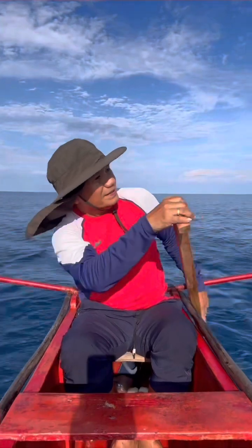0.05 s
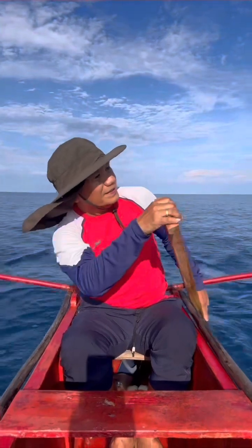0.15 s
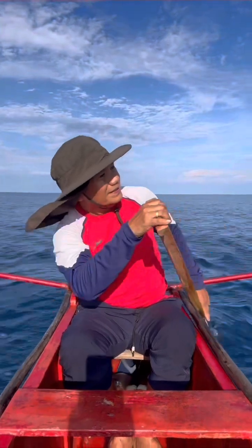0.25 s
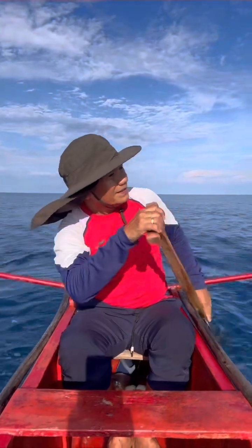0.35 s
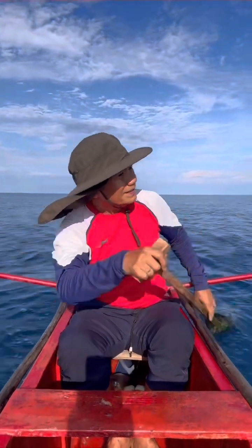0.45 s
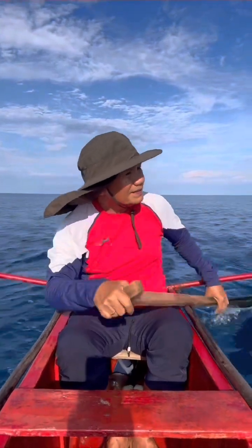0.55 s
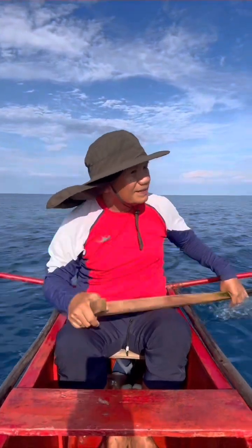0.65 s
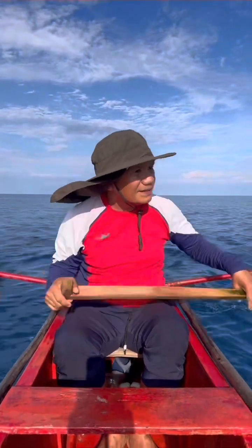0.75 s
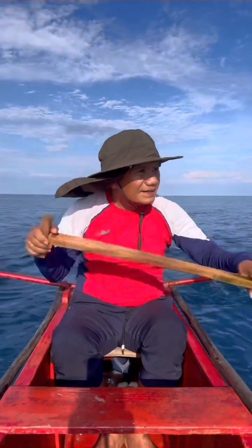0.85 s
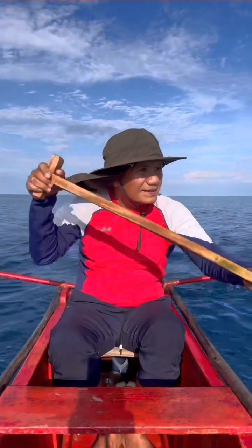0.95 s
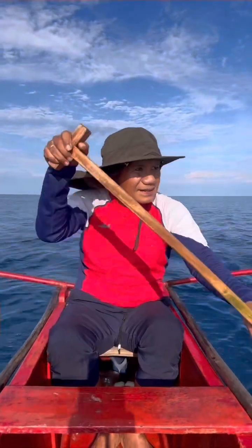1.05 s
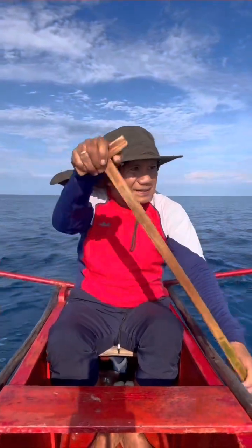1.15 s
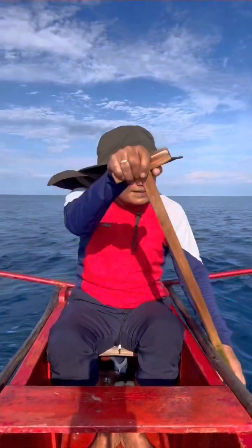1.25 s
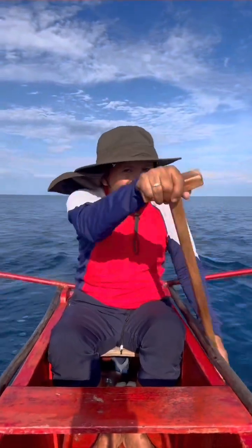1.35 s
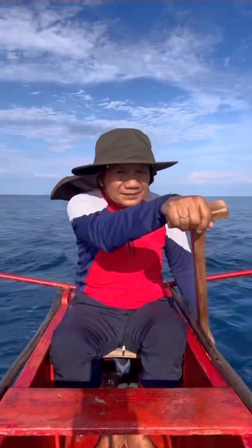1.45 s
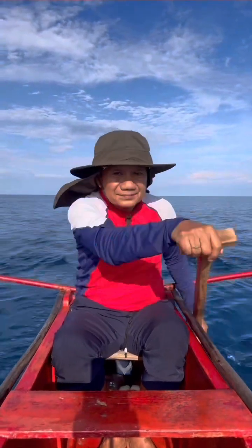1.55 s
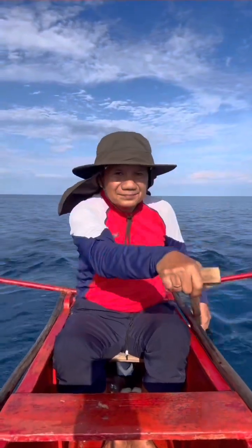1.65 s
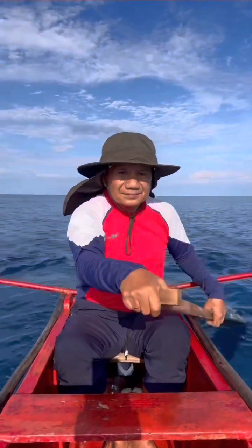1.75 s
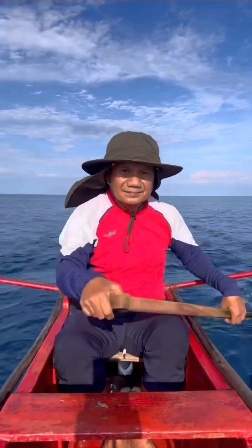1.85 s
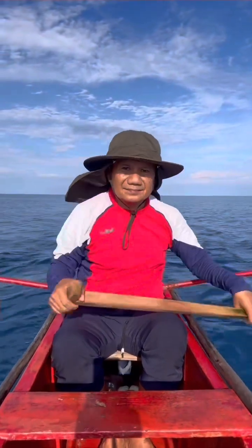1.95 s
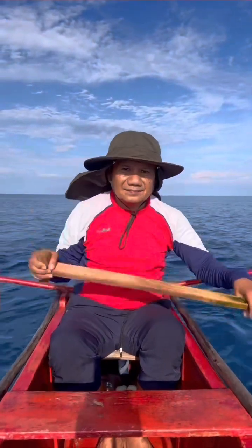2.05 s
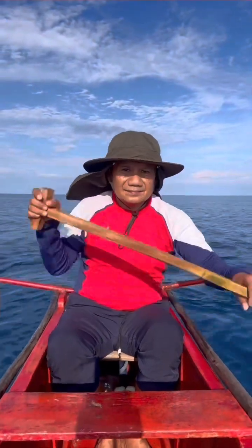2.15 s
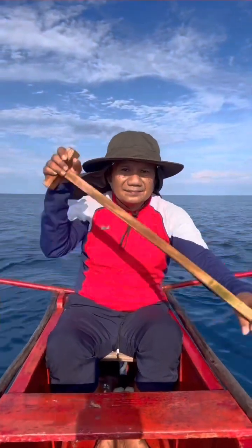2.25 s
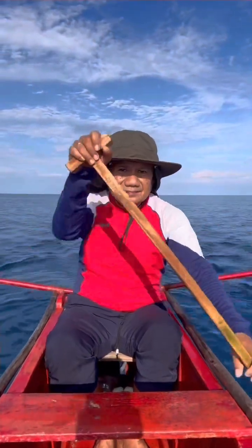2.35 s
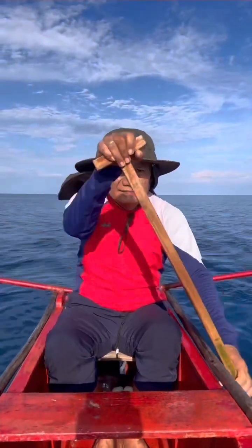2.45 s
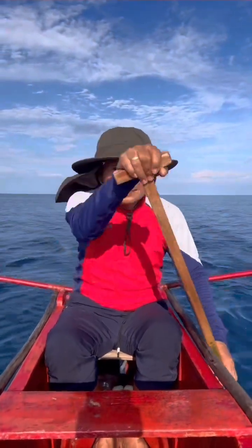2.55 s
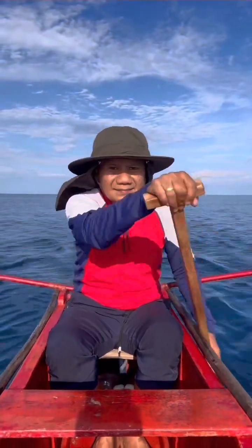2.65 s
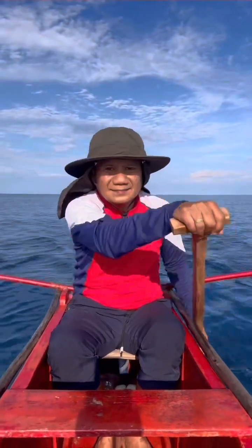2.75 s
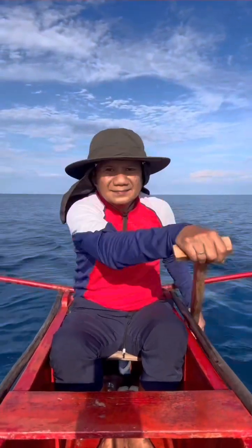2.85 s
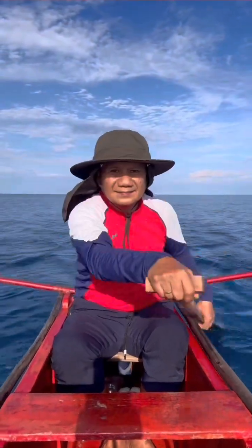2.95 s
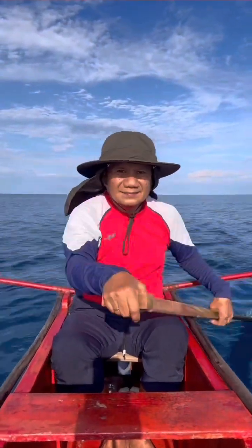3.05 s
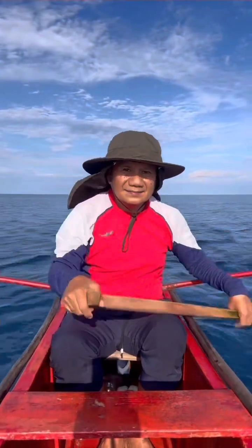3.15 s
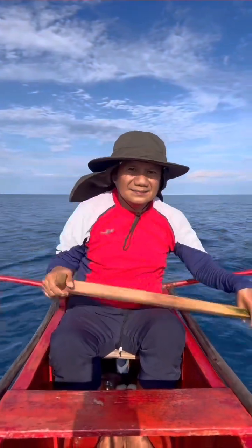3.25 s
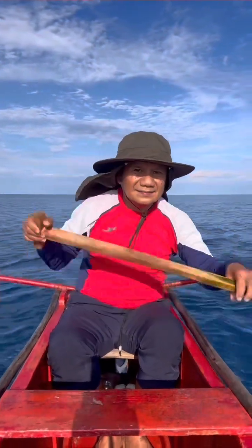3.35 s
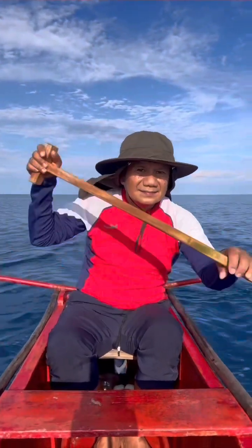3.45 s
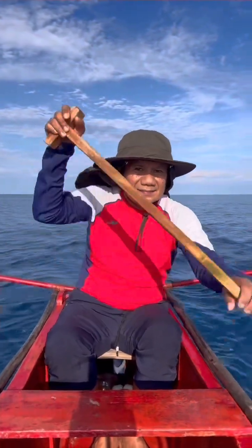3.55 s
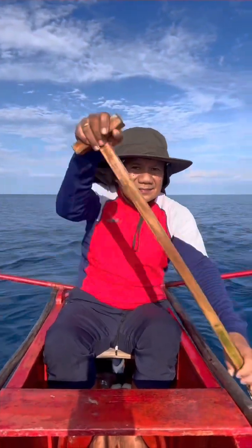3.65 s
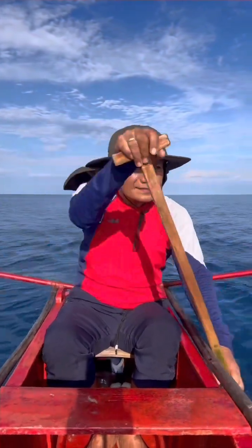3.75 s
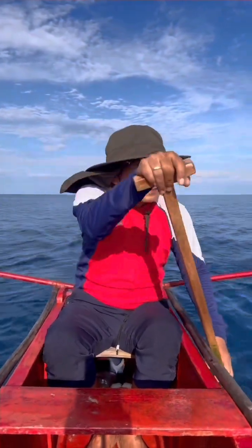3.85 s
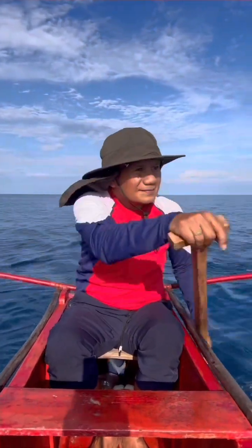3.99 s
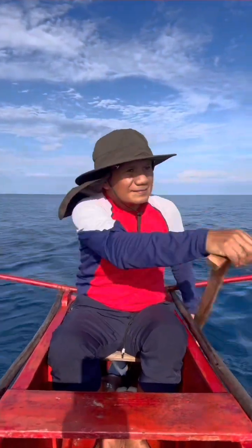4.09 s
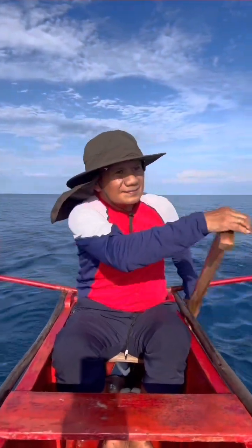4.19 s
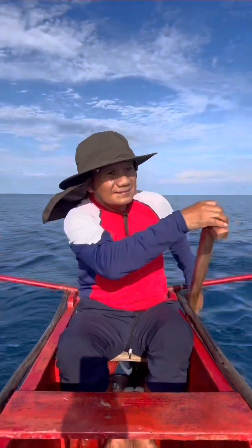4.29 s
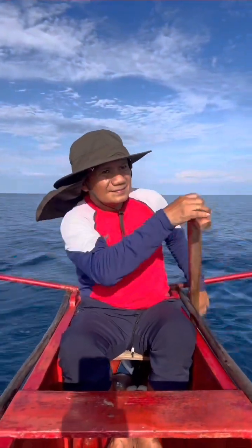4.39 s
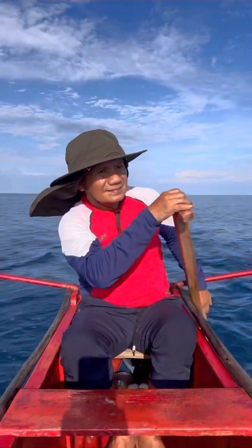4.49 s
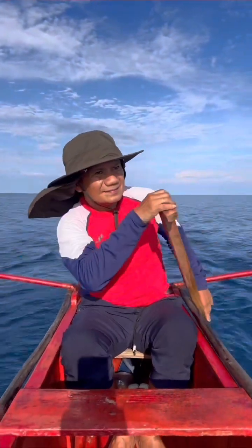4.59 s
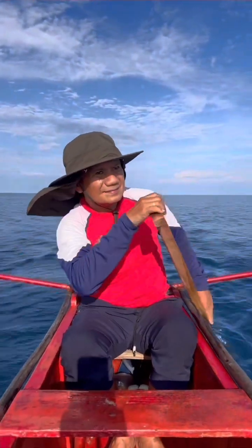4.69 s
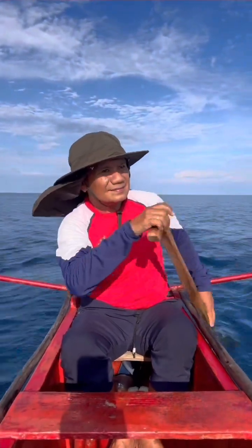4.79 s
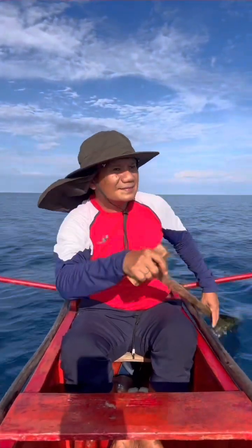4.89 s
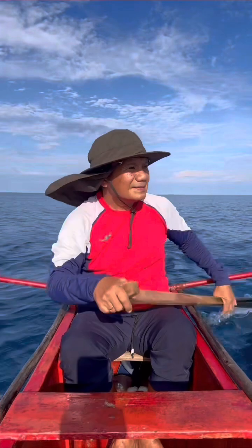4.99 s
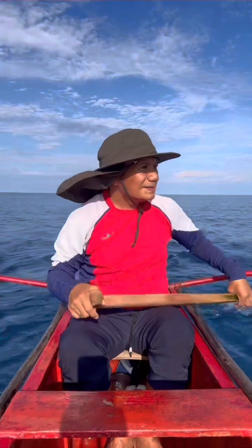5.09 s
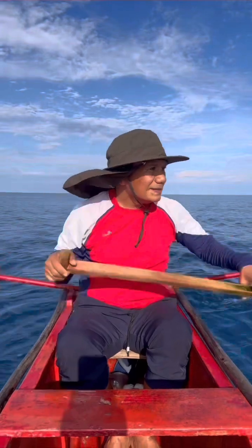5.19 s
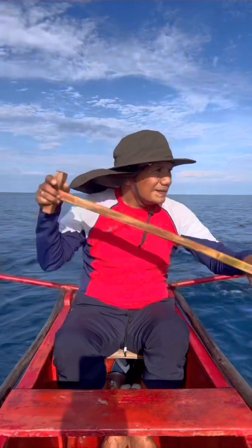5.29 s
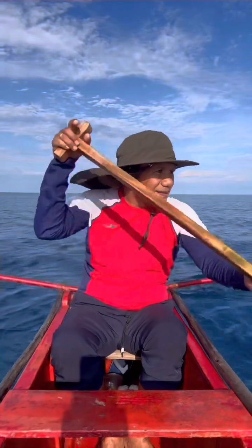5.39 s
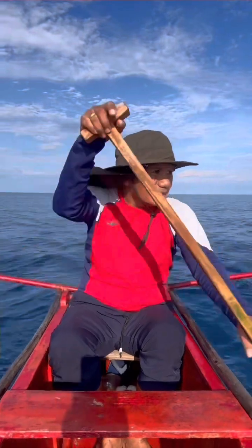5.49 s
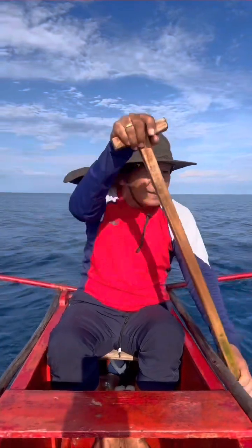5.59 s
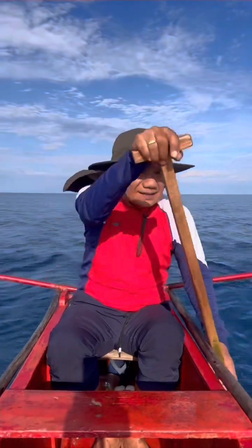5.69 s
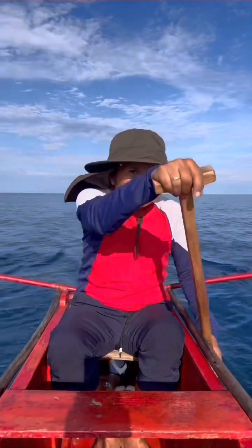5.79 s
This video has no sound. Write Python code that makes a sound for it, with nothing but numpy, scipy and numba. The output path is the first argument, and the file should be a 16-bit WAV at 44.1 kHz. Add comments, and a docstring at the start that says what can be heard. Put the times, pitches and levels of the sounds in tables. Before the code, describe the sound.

A wooden paddle strokes calm open water beside a small boat, with splashing entries, hollow gulps, bubbling plops, drips and light wind rumble.

```python
"""Paddling a small outrigger

A wooden paddle drives a small outrigger over a calm open sea, a stroke every second or two.
The blade splashes in and drags down air that gulps against the hull; bubbles and drips are heard too.
Gulps, plops and trickles are gliding sine bubbles; slaps, ticks and swashes add bursts of noise.
Ripples lap all round as crowds of bubbles, and shaped noise makes the hull's rumble and the light wind."""
import sys
import numpy as np
from scipy import signal
from scipy.fft import rfft, irfft, next_fast_len
from scipy.io import wavfile
from scipy.ndimage import uniform_filter1d
from numba import njit

SR = 44100
rng = np.random.default_rng(int(sys.argv[2]) if len(sys.argv) > 2 else 0)


def put_to_file(sound):
    """Save the sound as 16-bit audio at rate SR, in the file named by the first command-line argument."""
    columns = np.atleast_2d(sound).T  # one column per channel
    safe = np.clip(columns, -1, 1)
    whole_steps = np.round(safe * 32767)
    wavfile.write(sys.argv[1], SR, whole_steps.astype(np.int16))


N = 257103
TIME = np.arange(N) / SR

# Levels in these tables come before the hull's ringing and any trim made inside the functions.
# Falling times (called t60) are the seconds a sound takes to drop by 60 dB.

# Air pockets closing under water. Each row: start in seconds, level in dB, pitch in Hz, swell in seconds,
# falling time in seconds, hull boom in dB against the gulp, burble in dB against the gulp.
GULPS = [(0.495, -33, 240, 0.041, 0.032, -2, 9.5), (1.204, -16, 190.5, 0.016, 0.072, -7.5, 5.5),
         (1.245, -34.5, 199, 0.024, .16, 4, -3), (1.364, -35, 255, 0.025, 0.059, -7, 1.5),
         (2.535, -30, 213, 0.016, 0.15, 0.5, 4.5), (2.927, -45.5, 324, 0.014, 0.096, -11, 17),
         (3.653, -29.5, 192, 0.0071, 0.14, -9, 1), (3.698, -25, 202.7, 0.01, 0.19, -4, -5),
         (3.724, -24, 174.6, 0.015, 0.17, 1.5, 9), (3.750, -23.5, 211, .008, 0.15, 5.5, -5),
         (3.948, -33.5, 272.4, 0.021, 0.21, 4, 17.5), (4.194, -20, 200.8, 0.012, 0.21, -8.5, 7.5),
         (4.228, -26.5, 246, 0.01, 0.08, -8, -4), (4.936, -27.5, 362, 0.0056, 0.074, -38, 1),
         (5.562, -32.5, 201, 0.013, 0.17, -50, -27), (5.647, -26.5, 201.5, 0.019, 0.11, -2, 3)]
# A larger, deeper lobe follows each gulp; its pitch is a share of the gulp's.
DEEP_LOBE_DELAY_S, DEEP_LOBE_DB, DEEP_LOBE_PITCH, DEEP_LOBE_T60_S = 0.01225, -8, 0.744, 0.09
# Plops, each a knot of bubbles. Each row: start in seconds, level in dB, pitch in Hz,
# falling time in seconds, glide as a share of the pitch.
PLOPS = [(0.319, -31, 2680, 0.018, -0.076), (0.362, -22, 850, 0.028, 0.2), (0.547, -30, 1180, .04, .1),
         (0.65, -22.5, 810, 0.058, 0.32), (0.681, -30, 850, .04, .1), (0.825, -25, 874, 0.12, 0.21),
         (0.901, -24, 1440, 0.036, 0.22), (1.066, -30, 2380, .02, 0.069), (1.073, -22, 1620, 0.023, -0.022),
         (1.09, -22, 1680, .022, 0.067), (1.102, -20, 1390, .02, .15), (1.122, -18, 884, 0.09, 0.072),
         (1.142, -16, 1320, 0.026, .1), (1.145, -20, 780, .025, .1), (1.180, -20, 1220, .03, 0.1),
         (1.191, -17, 1180, .02, 0.065), (1.193, -21, 1850, 0.023, .1), (1.211, -22, 690, 0.023, -0.14),
         (1.224, -18, 547, 0.063, -.1), (1.382, -31, 2560, .02, .1), (1.476, -30.5, 2820, .025, 0.32),
         (1.555, -22, 2100, .022, .05), (1.557, -20.5, 2730, 0.043, 0.14), (1.610, -24, 1054, 0.049, .1),
         (1.791, -21.5, 1740, 0.032, .2), (1.875, -24.5, 1950, 0.05, 0.058), (1.911, -27, 1440, .035, 0.14),
         (2.052, -26.5, 950, .045, .1), (2.087, -21.5, 1046, 0.066, 0.46), (2.167, -28, 1880, 0.036, 0.093),
         (2.295, -25, 2050, 0.04, -0.11), (2.322, -17.5, 1720, 0.029, 0.3), (2.422, -29, 1400, .03, .1),
         (2.453, -26.5, 760, 0.037, 0.046), (2.487, -28, 978, 0.12, 0.13),
         (2.541, -25.5, 1870, 0.073, 0.16), (2.737, -23, 2120, 0.036, 0.038), (2.945, -25, 443, 0.17, 0.32),
         (3.013, -29.5, 1870, .035, 0.058), (3.056, -26, 1195, 0.053, 0.065),
         (3.303, -26, 1025, .04, 0.059), (3.620, -20.5, 2000, 0.025, -.1), (3.623, -21, 1520, 0.041, -.4),
         (3.654, -13, 1560, .012, 0.055), (3.654, -19, 430, 0.028, .1), (3.633, -23, 1154, 0.066, -.1),
         (3.681, -24, 590, 0.035, .3), (3.696, -13, 1230, 0.019, 0.1), (3.728, -17, 740, 0.027, 0.12),
         (3.957, -20, 397, .035, -0.25), (4.031, -17.5, 480, 0.067, -0.064), (4.046, -15, 463, 0.13, 0.047),
         (4.122, -26, 685, 0.1, 0.36), (4.150, -23, 1106, 0.056, 0.2), (4.198, -17, 790, 0.035, -0.2),
         (4.222, -21, 525, 0.061, -0.31), (4.28, -23, 850, .035, 0.26), (4.297, -18.5, 790, 0.049, 0.067),
         (4.314, -22.5, 770, 0.047, -0.012), (4.314, -20, 1800, 0.033, .05),
         (4.408, -24, 1920, 0.034, -0.026), (4.41, -25, 866, 0.037, .1), (4.463, -20.5, 590, 0.031, -0.22),
         (4.481, -20.5, 417, .06, 0.16), (4.664, -25.5, 2800, 0.032, 0.33), (4.723, -20, 2340, 0.025, 0.11),
         (4.811, -23.5, 987, 0.046, 0.23), (4.843, -26, 927, 0.045, .2), (4.949, -20, 2210, 0.059, 0.05),
         (5.009, -17, 740, 0.058, 0.15), (5.043, -25, 770, 0.11, 0.17), (5.218, -19.5, 1115, 0.038, 0.15),
         (5.313, -24.5, 400, 0.05, 0.025), (5.318, -26.5, 1104, 0.041, 0.24),
         (5.419, -23.5, 1170, 0.06, 0.18), (5.429, -24.5, 1290, .03, .05), (5.564, -27, 1020, .04, .1),
         (5.672, -23.5, 2760, 0.014, 0.078), (5.734, -24.5, 2680, 0.011, 0.2)]
# The blade and thrown water smack the surface. Each row: start in seconds, peak in dB, pitch in Hz,
# falling time in seconds.
SLAPS = [(0.312, -33, 2740, 0.11), (0.826, -34, 1720, 0.03), (1.039, -30, 4350, .02),
         (1.057, -29, 3930, 0.016), (1.069, -31, 1810, 0.071), (1.1, -32, 4600, .018),
         (1.122, -25, 4540, 0.027), (1.146, -38, 4000, 0.019), (1.177, -34, 4300, .02),
         (1.185, -31, 4150, 0.017), (1.208, -35, 620, 0.098), (1.211, -28.5, 1480, 0.044),
         (1.331, -31, 1710, 0.033), (1.558, -45, 2500, 0.042), (2.293, -31, 2030, 0.028),
         (2.325, -24.5, 2070, 0.047), (2.352, -31, 3900, 0.11), (2.736, -34, 1820, 0.05),
         (3.588, -27.5, 2020, 0.053), (3.655, -24, 1700, 0.011), (3.678, -31, 1510, 0.02),
         (3.696, -27, 1370, 0.016), (3.728, -26, 670, .14), (3.951, -30, 520, 0.1),
         (4.03, -31.5, 520, 0.028), (4.198, -27, 740, 0.036), (4.279, -31, 2880, 0.045),
         (4.313, -29.5, 1880, 0.053), (4.462, -28.5, 957, 0.06), (5.47, -32, 1990, .03),
         (5.548, -27.5, 2440, .04), (5.614, -27.5, 987, 0.022)]
# Sheets of water fold over into foam. Each row: start in seconds, length in seconds, average (rms) level
# in dB, centre in Hz.
SWASHES = [(0.0, 0.18, -50, 895), (0.024, 0.2, -52.5, 3600), (0.45, 0.14, -46, 299), (0.52, 0.22, -45, 810),
           (1.036, 0.052, -53, 4150), (1.054, 0.17, -47.5, 1680), (1.113, 0.05, -43, 4800),
           (1.216, 0.03, -39, 546), (1.241, 0.066, -48, 325), (1.825, 0.067, -45.5, 2780),
           (2.317, 0.094, -45.5, 3250), (2.987, 0.31, -64, 3200), (3.60, 0.047, -58, 1860),
           (3.712, 0.076, -40.5, 1800), (3.723, 0.042, -33, 770), (3.761, 0.041, -43, 473),
           (3.808, 0.088, -48, 1090), (3.982, 0.17, -53.5, 3250), (4.237, 0.17, -42, 179.6),
           (4.439, 0.093, -52.5, 3000), (4.90, 0.13, -50, 670), (4.942, 0.04, -54, 2200),
           (5.196, 0.042, -43.5, 2400), (5.517, 0.07, -45.5, 3600), (5.63, 0.047, -43, 590)]
# Chains of bubbles running up or down in pitch. Each row: start in seconds, length in seconds,
# loudest bubble in dB, first pitch in Hz, last pitch in Hz.
TRICKLES = [(0.321, .03, -33.5, 2720, 2190), (0.518, .035, -36, 593, 1160), (0.64, .06, -36, 776, 1000),
            (0.843, .035, -38, 1710, 2420), (1.273, .07, -39, 1860, 1960), (2.855, .03, -38.5, 700, 1280),
            (2.955, .02, -38.5, 1900, 2800), (3.017, .02, -37.5, 3200, 3600),
            (3.327, .022, -35, 1190, 1930), (3.372, .04, -38.5, 2300, 1960),
            (3.744, .035, -34.5, 2500, 3000), (4.053, .035, -39, 734, 1120)]
# Drops hitting the boat. Each row: start in seconds, level in dB, pitch in Hz.
TICKS = [(0.309, -33, 4300), (0.659, -31, 5360), (0.779, -26.5, 11400), (1.007, -26, 8600),
         (1.307, -17.5, 12500), (1.418, -28, 10300), (2.143, -27, 3080), (2.263, -25, 8900),
         (2.325, -19.5, 5730), (2.414, -24, 8050), (2.474, -29, 12900), (2.5197, -17.5, 9800),
         (2.521, -22, 5030), (2.564, -24.5, 9300), (2.617, -30, 4960), (2.706, -29, 7240),
         (2.88, -25.5, 6400), (3.02, -20.5, 7600), (3.031, -32, 6100), (3.655, -27, 7130),
         (3.866, -13, 6170), (3.883, -30, 12500), (3.964, -32, 5530), (4.082, -22, 11200),
         (4.151, -27, 3140), (4.31, -37, 7670), (4.609, -26, 14800), (4.688, -29, 8500),
         (4.789, -28.5, 6200), (5.323, -23.5, 5650), (5.428, -25.5, 9400), (5.609, -19, 13100),
         (5.678, -21, 12100), (5.732, -16.5, 12500)]

# Swells nudge the hull, which booms softly. Each row: start in seconds, level in dB.
NUDGES = [(0.0, -32), (0.44, -32.5), (1.572, -33), (2.05, -31.5), (2.66, -41), (3.25, -30), (4.529, -37),
          (4.789, -39), (5.059, -31)]
# The hull's lowest notes. Each row: pitch in Hz, level in dB, falling time in seconds.
HULL_NOTES = [(96.85, -1, 0.27), (132.2, -9, 0.17)]
BOOM_DELAY_S, BOOM_SWELL_S = 0.0225, 0.033    # the hull answers a gulp late and slowly
# The wooden hull rings along with the water. Each row: pitch in Hz, width in Hz, level in dB.
HULL_MODES = [(140.4, 20, -6.5), (203, 37, -4), (259, 10.7, -1), (406, 6.8, -1.5), (492, 10.4, -3.5),
              (764, 7.3, -33)]

# Paddle strokes, each with a spell of dripping. Each row: blade entry in seconds, entry length in seconds,
# spray in dB, churn in dB, pull length in seconds, hull rumble in dB, time when the dripping is at its fullest
# in seconds, drips in dB.
STROKES = [(-0.5, 0.11, -48, -45, 0.85, -52, 0.35, -72), (1.056, 0.15, -46, -44, 0.4, -40.5, 4.9, -68),
           (2.286, 0.15, -48.5, -47.5, 0.5, -40.5, 3.1, -52.5),
           (3.614, 0.13, -46, -45, 1.43, -41, 4.8, -56), (5.437, 0.2, -48, -51, .4, -39, 4.3, -71)]
ENTRY_ATTACK_S, ENTRY_RELEASE_S = 0.044, 0.18    # each release is a fall of 60 dB
PULL_ATTACK_S, PULL_RELEASE_S = 0.37, 0.49
DRIP_ATTACK_S, DRIP_HOLD_S, DRIP_RELEASE_S = 0.043, 0.25, 0.27
# Wavelets breaking against the side. Each row: start in seconds, slosh in dB, spray in dB.
WAVELETS = [(0.66, -61, -47), (1.85, -40, -51), (2.138, -39, -69), (3.689, -39, -41.5), (4.304, -37.5, -50),
            (4.785, -47, -63), (5.01, -43.5, -56), (5.218, -39, -69), (5.545, -38, -41.5)]
WAVELET_ATTACK_S, WAVELET_HOLD_S, WAVELET_RELEASE_S = 0.014, 0.016, 0.12
# How lively the sea is beside the boat. Each row: time in seconds, level in dB.
CHOP = [(0.0, -43), (0.68, -45.5), (0.89, -48), (1.15, -63), (1.28, -50.5), (1.46, -48.5), (2.03, -45),
        (2.47, -51), (2.61, -51), (2.68, -46), (3.15, -45.5), (3.39, -47), (4.11, -47.5), (4.34, -43.5),
        (4.55, -45.5), (5.1, -44), (5.24, -49), (5.6, -50.5), (5.83, -49.5)]
SLOSH_OVER_CHOP_DB = 1.5
SEA_SPRAY_DB, SEA_SPRAY_FOLLOWS = -55.5, 0.16    # level at average chop; share of the chop's swing
LAP_DB, LAP_FOLLOWS, LAP_PULL_DB = -49, 0.98, -9    # the same; eddies against the pull's rumble
GLIDE_RUMBLE_DB = -40.5    # the hull while the boat glides
RIPPLE_DB, RIPPLES_PER_S = 0.48, 20    # ripples make slosh and spray flutter together
SPATTER_DB = -0.5    # against the entry's spray
SPURT_DB, SPURTS_PER_S = 2.5, 70    # drops leave the blade in uneven spurts

# Tone colours of the water, the hull and the wind. Each row: pitch in Hz, relative level in dB.
SLOSH = [(300, -3.5), (500, 0.5), (800, 0.5), (1200, 0.5), (1900, -1.5), (2500, -8.5), (3500, -14),
         (6000, -35)]
SPRAY = [(1500, -8), (3000, 0), (4500, 0), (6500, -1), (9000, -7.5), (12500, 1), (16000, -32)]
FIZZ = [(1800, -12), (3000, 3.5), (4500, -1.5), (6500, 0), (10000, -8), (14000, -1.5)]
SPATTER = [(1200, -11), (2000, 22.5), (3000, -21), (4500, 11.5), (6500, -49)]
LAPPING = [(130, 3), (200, 4), (300, -5.5), (450, -4), (650, -11.5), (1100, -2)]
RUMBLE = [(45, -6), (65, 2), (80, 2), (97, 1.5), (120, -5), (150, -4.5), (200, -17), (400, -27.5)]
BUFFET = [(20, -15), (32, -12), (45, 4), (58, 9), (75, -3), (120, -23)]
# Wind buffeting the microphone. Each row: time in seconds, level in dB before WIND_DB is added.
BREEZE = [(0.0, -75), (0.18, -72), (0.29, -46.5), (0.71, -62), (1.54, -45), (3.36, -66), (4.25, -40.5),
          (4.35, -87), (4.55, -40), (5.83, -59)]
WIND_DB = 6

# How strongly the surrounding sound differs between the ears. Each row: pitch in Hz, level in dB.
WIDTH = [(60, -5), (130, 2.5), (300, 3), (700, 3.5), (1300, 7.5), (2500, 12.5), (5000, 15), (15000, 6)]
# The part that reaches the two microphone ports out of step. Each row: pitch in Hz, level in dB.
PORT_SKEW = [(900, -8), (1500, 7), (2300, -1), (2650, 18), (4000, 11), (6000, 22.5), (8000, 28), (15500, 0)]
# Response of the ports' sum, then of their difference. Each row: pitch in Hz, level in dB.
MID_RESPONSE = [(15, -2), (6200, -1.5), (6900, -9), (7800, -24.5), (8700, -9), (9400, 1), (13200, -3),
                (14200, -2), (15500, -28)]
SIDE_RESPONSE = [(15, 2), (9000, -24), (10200, -18.5), (11400, -33), (12600, -22), (13800, -14), (16000, 8)]
CUTOFF_HZ = 16000


def from_db(db):
    """Turn decibels into a gain."""
    return 10 ** (np.asarray(db) / 20)


def rms_one(x):
    """Scale a sound to an average power of 1."""
    return x / np.sqrt(np.mean(x ** 2) + 1e-20)


def in_time(rows):
    """Draw straight lines between the rows of a curve, for each column."""
    s, *columns = np.transpose(rows)
    return [np.interp(TIME, s, c) for c in columns]


def at_hz(points, hz):
    """Read the gain of a tone colour at some frequencies."""
    f, db = np.transpose(points)
    return from_db(np.interp(np.log(hz + 1), np.log(f), db))


def colour(x, points):
    """Shape a sound by a tone colour that falls away beyond its ends."""
    size = next_fast_len(N + 4096)
    hz = np.arange(size // 2 + 1) * SR / size
    low_end = np.minimum(1, hz / points[0][0]) ** 2
    high_end = np.maximum(1, hz / points[-1][0]) ** 2
    return irfft(rfft(x, size) * at_hz(points, hz) * low_end / high_end, size)[..., :N]


def band_noise(noise, order, low_hz, high_hz):
    """Keep one band of a noise."""
    edges = np.clip([low_hz, high_hz], 50, 15000)
    return signal.sosfilt(signal.butter(order, edges, "band", fs=SR, output="sos"), noise)


def drift(rate):
    """Wander smoothly by chance, with a spread of 1 and a new goal `rate` times a second."""
    knots = rng.standard_normal(4000)
    return rms_one(np.interp(TIME * rate, np.arange(len(knots)), knots))


def add(out, s, sound):
    """Mix a sound in at a time in seconds."""
    i = max(0, int(s * SR))
    part = sound[:max(0, N - i)]
    out[i:i + len(part)] += part


def swell_up(s, attack, hold, release):
    """Make a loudness curve that is full at time s, holds, then dies away."""
    rise = np.clip(1 + (TIME - s) / attack, 0, 1)
    return rise * from_db(-60 * np.clip((TIME - s - hold) / release, 0, 3))


def together_db(gains):
    """Find the joint level of unrelated sounds."""
    return 10 * np.log10(sum(g ** 2 for g in gains) + 1e-12)


def two_places(x):
    """Put a texture ahead and, shifted by half its length so it seems unrelated, to the sides."""
    return np.stack([x, np.roll(x, N // 2)])


def bubble(hz, t60, rise, swell):
    """A pulsing pocket of air: it swells, dies away and glides in pitch."""
    t = np.arange(int((t60 + swell) * SR) + 2) / SR
    swelling = np.sin(np.pi / 2 * np.minimum(t / swell, 1)) ** 2
    dying = np.exp(-np.log(1000) * np.maximum(t - swell, 0) / t60)
    return swelling * dying * np.sin(2 * np.pi * hz * t * (1 + rise * t / (2 * t60)))


@njit
def ring_bubbles(starts, gains, poles, glides, swells, lengths, size):
    """Each bubble swells, then dies away while its pitch creeps up sample by sample."""
    out = np.zeros(size)
    for k in range(len(starts)):
        state, pole = gains[k] + 0j, poles[k]
        for i in range(starts[k], min(size, starts[k] + lengths[k])):
            out[i] += state.imag * min(1.0, (i - starts[k]) / swells[k])
            state *= pole
            pole *= glides[k]
    return out


def bubble_cloud(spectrum, cycles, spread_db, rise, count, size=5, swell_cycles=1):
    """Bubbles are born in small families of like pitch; a few ring on, and all sharpen as they near the surface."""
    families = rng.random((count // size, 3))
    born, smallness, vigour = np.repeat(families, size, axis=0).T
    late, detune, damping, glide, sign, strength = rng.random((len(born), 6)).T
    lowest, highest = np.sqrt(spectrum[0][0]), np.sqrt(spectrum[-1][0])
    family_hz = (lowest * (1 - smallness) + highest * smallness) ** 2
    hz = family_hz * 2 ** ((detune - .5) / 2)
    loud = from_db(spread_db * np.minimum(-np.log(vigour), 3)) * (strength + .5)
    gain = at_hz(spectrum, hz) * hz ** (3 / 4) * loud * np.sign(sign - .5)
    turn = 2 * np.pi * hz / SR    # angle per sample
    life = cycles * (.5 + 2 * damping ** 2) * SR / hz    # samples
    poles = np.exp(1j * turn - np.log(1000) / life)
    glides = np.exp(2j * turn * rise * glide ** 2 / life)
    starts = (born * N + late ** 2 * SR / 40).astype(int)
    out = ring_bubbles(starts, gain, poles, glides, swell_cycles * SR / hz, life.astype(int), N)
    # Even out the level over a twentieth of a second.
    return out / np.sqrt(uniform_filter1d(out ** 2, SR // 20) + np.mean(out ** 2) / 10)


def gulps(burble_s, burble_top_hz, burble_low_hz, count):
    """The air pocket throbs, sheds ever larger and deeper bubbles, and sets the hull booming."""
    out = np.zeros(N)
    for s, db, hz, swell, t60, boom_db, burble_db in GULPS:
        add(out, s, from_db(db) * bubble(hz, t60, -0.053, swell))
        smaller_lobe = bubble(1.212 * hz, t60, -0.27, swell)
        add(out, s + 0.00483, from_db(db - 12.5) * smaller_lobe)
        deep_lobe = bubble(DEEP_LOBE_PITCH * hz, DEEP_LOBE_T60_S, 0, swell)
        add(out, s + DEEP_LOBE_DELAY_S, from_db(db + DEEP_LOBE_DB) * deep_lobe)
        add(out, s + BOOM_DELAY_S, boom(db + boom_db))
        for k, (late, detune, strength) in enumerate(rng.random((count, 3))):
            age = (k + late) / count
            f = burble_top_hz * (burble_low_hz / burble_top_hz) ** age * 2 ** (detune - .5)
            # Loudest halfway through the burble.
            gain = from_db(db + burble_db - 16.0 + 5.5 * strength - 5.7 * abs(2 * age - 1))
            add(out, s + burble_s * age ** 2, (-1) ** k * gain * bubble(f, 14 / f, 0.024, .5 / f))
    return out


def plops(scatter_s, octaves, count):
    """A lump of water lands: one main bubble, then a few fainter companions."""
    out = np.zeros(N)
    for s, db, hz, t60, glide in PLOPS:
        add(out, s, from_db(db - 10.5) * bubble(hz, t60, glide, 0.0016))
        for late, detune, strength in rng.random((count, 3)):
            f = hz * 2 ** (octaves * (detune - .35))
            gain = from_db(db - 18.5 + 2.5 * strength)
            add(out, s + scatter_s * late ** 2, gain * bubble(f, 14 / f, 0.4, .5 / f))
    return out


def slaps(octaves, crack_db, count):
    """A smack bursts at once into a shower of bubbles that quickly thins out."""
    out, t = np.zeros(N), TIME[:SR // 8]
    for s, db, hz, t60 in SLAPS:
        crack = rng.standard_normal(len(t)) * from_db(crack_db - 60 * t / t60)
        burst = band_noise(crack, 1, hz / 2, hz * 2)
        for late, detune, strength in rng.random((count, 3)):
            f = hz * 2 ** (octaves * (detune - .5))
            gain = (2 * strength - 1) * from_db(-14 * late ** 2)
            add(burst, t60 * late ** 2 / 2, gain * bubble(f, 18 / f, 0.4, .5 / f))
        add(out, s, from_db(db) * burst / np.abs(burst).max())
    return out


def swashes(octaves, wash_db, spread_db, count):
    """Folding water swells and fades as a crowd of like bubbles, a few of them loud, over a soft rush."""
    out = np.zeros(N)
    for s, length_s, db, hz in SWASHES:
        t = TIME[:int(length_s * SR)]
        rush = band_noise(rng.standard_normal(SR), 2, hz / 1.5, hz * 1.5)[:len(t)]
        crowd = np.zeros(N)
        for k, (late, detune, strength) in enumerate(rng.random((count, 3))):
            f = hz * 2 ** (octaves * (detune - .5))
            gain = (-1) ** k * from_db(spread_db * strength ** 2)
            add(crowd, length_s * (k + late) / count, gain * bubble(f, 34 / f, 0.037, .5 / f))
        foam = rms_one(rms_one(crowd[:len(t)]) + from_db(wash_db) * rms_one(rush))
        add(out, s, from_db(db) * foam * np.sqrt(np.sin(np.pi * t / length_s)))
    return out


def trickles(scatter_octaves, cycles, count):
    """Running water sheds bubbles one by one, their sizes and so their pitches moving along a slope."""
    out = np.zeros(N)
    for s, length_s, db, first_hz, last_hz in TRICKLES:
        for k, (late, detune, strength) in enumerate(rng.random((count, 3))):
            age = (k + late) / count
            f = first_hz * (last_hz / first_hz) ** age * 2 ** (scatter_octaves * (detune - .5))
            gain = from_db(db - 8.7 * strength)
            add(out, s + length_s * age, gain * bubble(f, cycles / f, 0.21, 3 / f))
    return out


def ticks(t60, crack_db, crack_low_hz):
    """A drop hits the boat: a sharp crack of noise and a very short ping."""
    out, t = np.zeros(N), TIME[:SR // 50]
    bright = signal.butter(2, crack_low_hz, "high", fs=SR, output="sos")
    for s, db, hz in TICKS:
        add(out, s, from_db(db - 7.5) * bubble(hz, t60, 0.06, 0.000067))
        noise = rng.standard_normal(len(t)) * from_db(-60 * t / t60)
        add(out, s, from_db(db + crack_db) * signal.sosfilt(bright, noise))
    return out


def boom(db):
    """The hollow hull's lowest notes swell up together."""
    out = np.zeros(N)
    for hz, note_db, t60 in HULL_NOTES:
        add(out, 0, from_db(db + note_db) * bubble(hz, t60, 0, BOOM_SWELL_S))
    return out[:SR // 2]


def nudges():
    """Now and then a swell pushes against the hull and it booms."""
    out = np.zeros(N)
    for s, db in NUDGES:
        add(out, s, boom(db))
    return out


def hull(x):
    """Planks and the hollow of the boat ring on after each push of water, as narrow resonances."""
    out = np.zeros(N)
    for hz, width_hz, db in HULL_MODES:
        b, a = signal.iirpeak(hz, hz / width_hz, fs=SR)
        out += from_db(db) * signal.lfilter(b, a, x)
    return out


def water_levels():
    """Levels in dB of slosh, spray, lapping and rumble, from chop, wavelets, strokes and dripping."""
    chop_db, = in_time(CHOP)
    swing_db = chop_db - chop_db.mean()
    churn = [from_db(chop_db + SLOSH_OVER_CHOP_DB)]
    drops = [from_db(SEA_SPRAY_DB + SEA_SPRAY_FOLLOWS * swing_db)]
    laps = [from_db(LAP_DB + LAP_FOLLOWS * swing_db)]
    rumble = [from_db(GLIDE_RUMBLE_DB)]
    for s, entry_s, spray_db, churn_db, pull_s, pull_db, drip_full_s, drips_db in STROKES:
        entry = swell_up(s, ENTRY_ATTACK_S, entry_s, ENTRY_RELEASE_S)
        pull = swell_up(s + entry_s, PULL_ATTACK_S, pull_s, PULL_RELEASE_S)
        dripping = swell_up(drip_full_s, DRIP_ATTACK_S, DRIP_HOLD_S, DRIP_RELEASE_S)
        churn.append(from_db(churn_db) * entry)
        drops += [from_db(spray_db) * entry, from_db(drips_db) * dripping]
        laps.append(from_db(pull_db + LAP_PULL_DB) * pull)
        rumble.append(from_db(pull_db) * pull)
    for s, churn_db, spray_db in WAVELETS:
        breaking = swell_up(s, WAVELET_ATTACK_S, WAVELET_HOLD_S, WAVELET_RELEASE_S)
        churn.append(from_db(churn_db) * breaking)
        drops.append(from_db(spray_db) * breaking)
    return [together_db(layer) for layer in (churn, drops, laps, rumble)]


def spatter():
    """Each entry of the blade flings coarse drops that ring as they fall back."""
    level = np.zeros(N)
    for s, entry_s, spray_db, *_ in STROKES:
        entry = swell_up(s, ENTRY_ATTACK_S, entry_s, ENTRY_RELEASE_S)
        level += from_db(spray_db + SPATTER_DB) * entry
    spurts = from_db(SPURT_DB * drift(SPURTS_PER_S))
    drops = bubble_cloud(SPATTER, cycles=44, spread_db=5.5, rise=0.082, count=2000)
    return level * spurts * two_places(drops)


def slosh(level_db, wash_db):
    """Churned water: distinct bubbles over a noise wash standing for countless faint ones."""
    near = bubble_cloud(SLOSH, cycles=50, spread_db=2.7, rise=.09, count=8000, swell_cycles=3)
    wash = rms_one(colour(rng.standard_normal(N), SLOSH))
    return from_db(level_db - 1.5) * two_places(near + from_db(wash_db) * wash)


def spray(level_db, drops_per_s, clump_db, fizz_db):
    """Fine droplets patter back on the sea in clumps, with fizzing tiny bubbles and a steady far hiss."""
    drops = (rng.random(N) < drops_per_s / SR) * rng.laplace(0, 1, N)
    clumps = from_db(clump_db * drift(90))
    patter = rms_one(colour(drops * clumps, SPRAY))
    fizz = bubble_cloud(FIZZ, cycles=75, spread_db=4.4, rise=.05, count=7500)
    far_hiss = from_db(-62.0) * rng.standard_normal((2, N))
    return from_db(level_db - 2.0) * two_places(patter + from_db(fizz_db) * fizz) + far_hiss


def lapping(level_db):
    """Ripples lap all round as a crowd of low, short, rising bubbles."""
    laps = bubble_cloud(LAPPING, cycles=17.8, spread_db=4.0, rise=0.382, count=1000, swell_cycles=1.97)
    return from_db(level_db) * two_places(laps)


def hull_rumble(level_db):
    """The hull rumbles as deep noise, stronger during each pull."""
    return from_db(level_db) * two_places(rms_one(colour(rng.standard_normal(N), RUMBLE)))


def wind():
    """Eddies press on the microphone as a deep, uneven flutter."""
    breeze_db, = in_time(BREEZE)
    buffeting = rms_one(colour(rng.standard_normal(N), BUFFET))
    return from_db(breeze_db + WIND_DB) * two_places(buffeting)


def scene():
    """Near water is heard as one source, with a diffuse sea and wind spread around it."""
    slosh_db, spray_db, lap_db, rumble_db = water_levels()
    paddle = gulps(burble_s=.045, burble_top_hz=802, burble_low_hz=244, count=14)
    paddle += plops(scatter_s=0.027, octaves=0.73, count=6)
    paddle += slaps(octaves=2.04, crack_db=-7.5, count=16)
    paddle += swashes(octaves=1.35, wash_db=-4.0, spread_db=10.5, count=60)
    paddle += trickles(scatter_octaves=0.15, cycles=37, count=6)
    paddle += ticks(t60=0.0035, crack_db=-6, crack_low_hz=6000)
    paddle += nudges()
    ripple_db = RIPPLE_DB * drift(RIPPLES_PER_S)
    sea = slosh(slosh_db + ripple_db, wash_db=-4)
    sea += spray(spray_db + ripple_db, drops_per_s=5400, clump_db=3.5, fizz_db=-1.0)
    ahead, around = sea + spatter() + lapping(lap_db) + hull_rumble(rumble_db) + wind()
    # An echo off the side of the boat, 3.7 ms late.
    echo = from_db(-9) * np.interp(TIME - .0037, TIME, paddle, left=0)
    middle = paddle + ahead + hull(paddle + ahead)
    # The surroundings are added to one ear and taken from the other.
    return middle + colour(around + echo, WIDTH) * [[1], [-1]]


def record(dry):
    """Closely spaced ports: treble arrives out of step, with one dip in their sum and others in their difference."""
    mid, side = (dry[0] + dry[1]) / 2, (dry[0] - dry[1]) / 2
    skew = colour(mid, PORT_SKEW)
    quarter_cycle_late = np.imag(signal.hilbert(skew, next_fast_len(N)))[:N]
    side = colour(side - quarter_cycle_late, SIDE_RESPONSE)
    mid = colour(mid, MID_RESPONSE)
    low_pass = signal.ellip(10, .2, 80, CUTOFF_HZ, fs=SR, output="sos")
    return signal.sosfilt(low_pass, mid + side * [[1], [-1]])


dry = scene()
out = record(dry)
put_to_file(out)
```